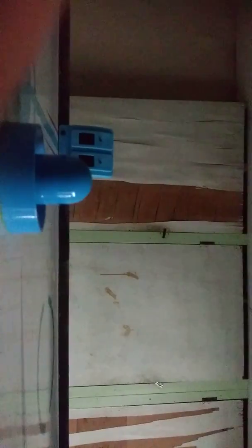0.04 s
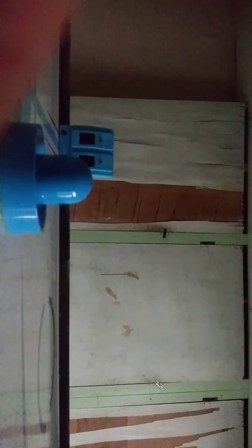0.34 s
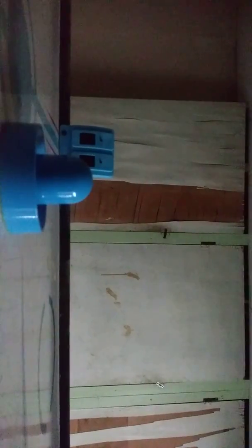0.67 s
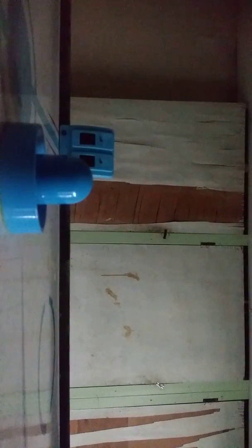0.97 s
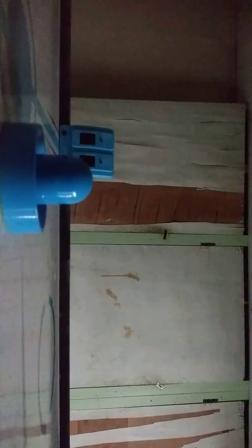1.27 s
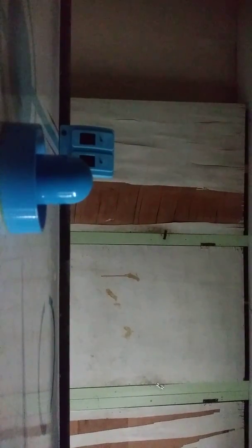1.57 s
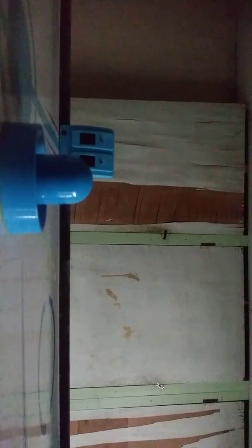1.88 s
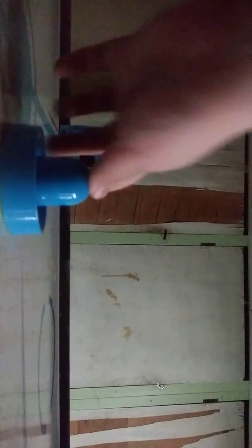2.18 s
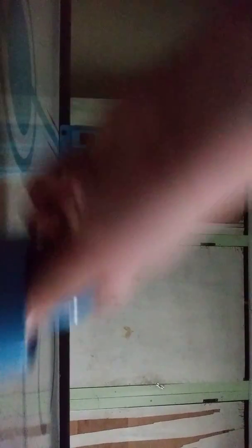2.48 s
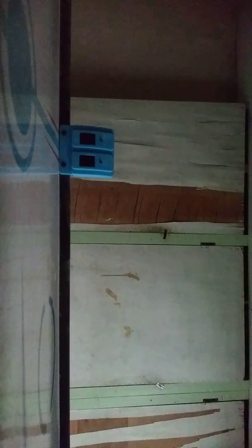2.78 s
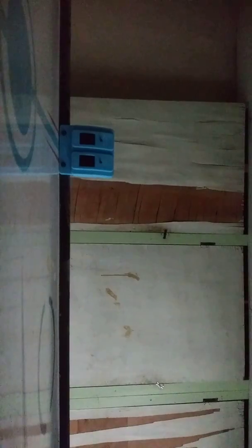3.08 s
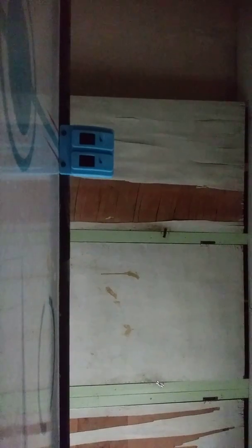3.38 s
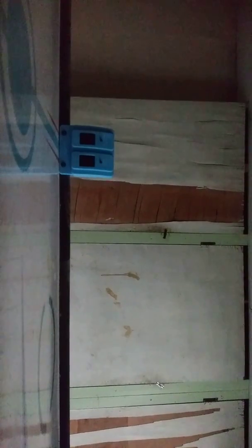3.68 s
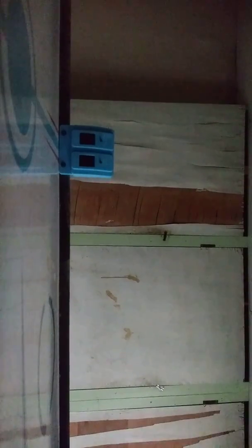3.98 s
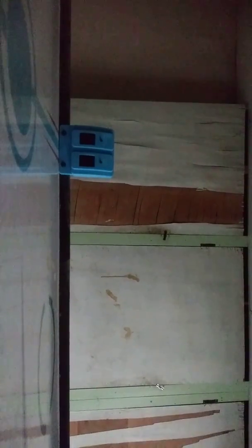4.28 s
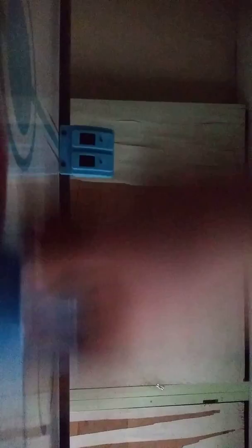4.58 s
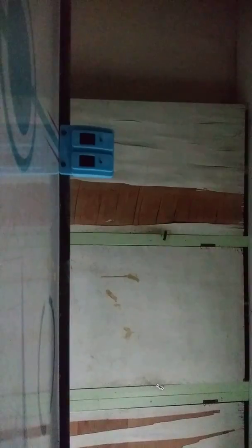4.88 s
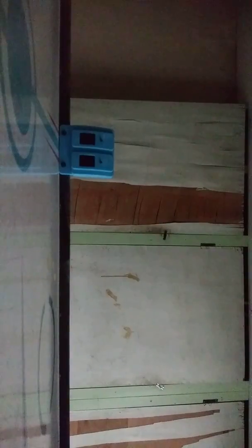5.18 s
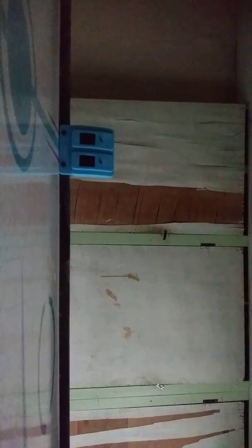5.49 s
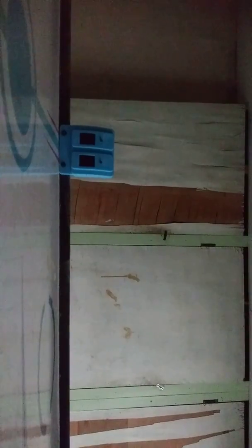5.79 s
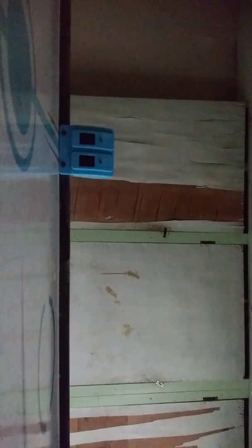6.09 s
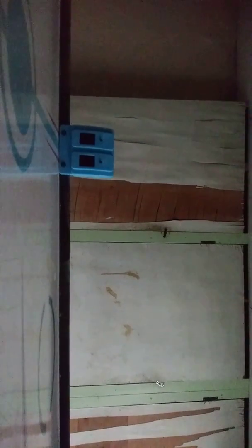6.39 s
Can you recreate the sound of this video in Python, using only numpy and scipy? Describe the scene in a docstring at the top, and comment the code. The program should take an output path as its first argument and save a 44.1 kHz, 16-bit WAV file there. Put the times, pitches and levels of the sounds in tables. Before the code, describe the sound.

A plastic puck clacks and scrapes across an air hockey table, with two hard, booming hits over a steady blower whine.

```python
"""A plastic puck on an air hockey table in a small room, heard from the table's edge.
The puck glides over the air holes with a grainy scrape, is hit hard twice, clacks against the rails
and chatters as it wobbles and settles. Each hard blow makes the hollow table boom.
Behind it the blower's fan whines steadily over rushing air, and at the start
air hisses past a hand and a resting mallet."""
import sys
import numpy as np
from scipy import signal
from scipy.fft import rfft, irfft
from scipy.io import wavfile

SR = 44100
rng = np.random.default_rng(int(sys.argv[2]) if len(sys.argv) > 2 else 0)


def wrap_up_sound(samples):
    """Save the sound to the file named by the first command line argument, as 16-bit audio."""
    columns = np.atleast_2d(samples).T
    # keep every value between -1 and 1, then stretch to whole-number steps
    tamed = np.clip(columns, -1, 1)
    steps = np.round(tamed * 32767).astype(np.int16)
    wavfile.write(sys.argv[1], SR, steps)


N = 284445
TIME = np.arange(N) / SR
HZ = np.fft.rfftfreq(N, 1 / SR)
RING_TIME = TIME[:SR // 2]  # the half second after a hit
TOP_HZ = 15950  # upper edge of the treble


def knocks():
    """A blow makes a clack, the puck rings briefly, and a boom spreads through the hollow table."""
    # each blow: (time [s], clack level [dB], clack pitch [Hz], clack ring time [s], puck level [dB],
    # treble cutoff [Hz], boom level [dB], place [0 side rail to 1 end rail])
    blows = [(3.0741, -14.5, 5800, 0.0056, -8.5, 11000, -11, 0.11),
             (3.0771, -6.5, 428, 0.02, -11.5, 4000, -26, 0),
             (3.0882, -3.5, 497, 0.066, -42, 3000, -21.5, 0),
             (3.1488, -15, 1790, 0.012, -19, 3800, -46, .5),
             (3.2190, -26, 1850, 0.0049, -17.5, 5300, -57, .5),
             (3.3983, -20, 2780, 0.007, -25, 7060, -31, 0.31),
             (3.573, -29, 1410, 0.088, -22, 6500, -27, 0.32),
             (4.2678, 6.5, 1600, 0.0054, -9, 4560, -9.5, 0.73),
             (4.2804, -20, 1380, 0.057, -6, 12000, -15.5, 0.65),
             (4.3765, 0, 4640, 0.0027, -14, 8900, -30, 0.47),
             (4.4644, -6.5, 2120, 0.0045, -10.5, 6000, -24, 0.73),
             (5.28, -32, 1450, .08, -33, 3980, -45, 0.49),
             (5.7548, -47, 3010, 0.0091, -28, 13000, -30.5, 0.44)]
    # the puck struck on its edge: (pitch [Hz], level [dB], ring time [s])
    puck_tones = [(1387, -12.5, 0.027), (1850, -6, .012), (2610, -8, 0.01), (3196, 1, 0.0046),
                  (4540, 0.5, 0.0043), (5230, -8.5, 0.0078), (6280, -5.5, 0.0042), (9600, -16, 0.0075),
                  (11800, -24, 0.0044), (14600, -12, .004)]
    # the table's tones: (pitch [Hz], level from side rail [dB], level from end rail [dB], ring time [s])
    table_tones = [(191, -13, -50, 0.22), (273, -23.5, 0, 0.26), (368.6, -14.5, -8.5, 0.13),
                   (408, -20, -30, 0.29), (437, -6.5, -14, 0.051), (496, 8, -33, 0.091),
                   (550.4, -20, -12, 0.22), (636, -11, 3, 0.045), (676, -15, -4.5, 0.12),
                   (743.5, -14, -15, 0.24), (942, -2, -54, 0.08), (1006, -18, -66, 0.11),
                   (1050, -4, -78, 0.091), (1144, -23, -23, 0.4), (1397, -10, -8, 0.086),
                   (1487, -11, -5, 0.086)]
    # the table's many weak tones blur into a rumble: (frequency [Hz], level [dB])
    rumble_colour = [(30, -40), (140, -34), (250, 5), (700, 2), (1500, 2), (2100, -4), (4000, -4.5),
                     (6500, -15), (8500, -25.5), (16000, -32)]
    # how long that rumble lasts: (frequency [Hz], ring time [s])
    rumble_times = [(200, 0.66), (1500, 0.37), (4000, 0.13), (12000, 0.25)]
    out = np.zeros(N)
    table_hz, side_db, end_db, table_ring_s = np.transpose(table_tones)
    spread = 1 - np.exp(-RING_TIME / 0.0025)
    for start, clack_db, hz, ring_s, puck_db, cutoff_hz, boom_db, place in blows:
        clack = ring(hz, clack_db, ring_s)
        clack *= 1 - np.exp(-RING_TIME[:len(clack)] * hz / 0.61)  # builds up in about one cycle
        puck = amp(-14) * rng.standard_normal(len(RING_TIME)) * np.exp(-RING_TIME / 0.0021)
        add(puck, 0, ring(*np.transpose(puck_tones)))
        contact = signal.butter(2, cutoff_hz, fs=SR)  # a longer contact leaves out the treble
        boom = ring(table_hz, side_db + place * (end_db - side_db), table_ring_s)
        add(out, start, clack)
        add(out, start, amp(puck_db) * signal.lfilter(*contact, puck))
        add(out, start, amp(boom_db) * boom * spread[:len(boom)])
        add(out, start, amp(boom_db + 17) * dying_noise(rumble_colour, rumble_times))
    return out


def chatter(extra_slaps):
    """The wobbling puck slaps the table, each time on another part of its rim."""
    # the main slaps: (time [s], level [dB], brightness [dB per octave])
    slaps = [(.527, -42, 9), (1.995, -45, 6), (3.485, -51, 23), (3.606, -27, 1), (4.476, -24, -1),
             (4.483, -22, -12), (4.507, -21.5, -9), (4.5326, -19.5, 0), (4.538, -20, 0), (4.5456, -19, -4),
             (4.571, -23, 3), (4.578, -17.5, -3), (4.599, -27, 6), (4.946, -31, -0.5), (4.9776, -34, -5),
             (5.192, -32, -1)]
    # the puck landing flat: (pitch [Hz], level [dB], ring time [s])
    slap_tones = [(1480, -14, 0.013), (2570, -8.5, 0.0055), (3200, -6.5, 0.029), (3710, -6.5, 0.015),
                  (4530, -9, 0.0071), (5700, -11, 0.017), (6700, -17, 0.012), (9100, -19, 0.014),
                  (12600, -31, .008), (15000, -39, 0.0026)]
    out = np.zeros(N)
    hz, db, ring_s = np.transpose(slap_tones)
    snap_fade = np.exp(-RING_TIME[:SR // 50] / .0012)
    chances = rng.standard_normal((200, 2, len(hz)))
    bursts = rng.standard_normal((200, SR // 40))
    for (start, slap_db, bright_db), (spot, detune), burst in zip(slaps + extra_slaps, chances, bursts):
        tilt_db = bright_db * np.log2(hz / 4000)
        add(out, start, ring(hz * (1 + 0.027 * detune), slap_db + db + tilt_db + 2.6 * spot, ring_s))
        add(out, start, amp(slap_db + bright_db - 13) * burst[:len(snap_fade)] * snap_fade)
    return out


def wobbles(scrape_gain, per_s=45, above_scrape_db=9.5, spread_db=8):
    """Random slaps for chatter() to play: the faster the slide, the louder they are."""
    chance = rng.random(N)
    strength, bright = rng.uniform(-1, 1, (2, N))
    moments = np.flatnonzero((scrape_gain > amp(-50)) & (chance < per_s / SR))
    return [(i / SR, 20 * np.log10(scrape_gain[i]) + above_scrape_db + spread_db * strength[i],
             5 * bright[i]) for i in moments]


def slide_gains(sing_lag_s=0.085):
    """Each slide swells to its fastest moment and dies away; the puck sings as it slows."""
    # (fastest moment [s], swell time [s], fade time [s], scrape [dB], fizz [dB], singing [dB])
    slides = [(1.8, .17, .15, -50, -65, -65), (2.55, 0.33, 0.39, -59, -56.5, -68),
              (3.05, 0.29, 0.023, -51, -49, -64), (3.41, 0.081, 0.12, -48, -52, -46.5),
              (3.63, 0.044, 0.078, -42.5, -45, -60), (3.78, 0.077, 0.13, -43, -50.5, -40.5),
              (4.335, 0.026, .05, -35.5, -41.5, -41), (4.48, 0.077, 0.18, -37, -45.5, -42),
              (5.23, 0.14, 0.16, -50, -60, -49), (5.78, 0.066, 0.063, -45.5, -57, -56),
              (5.95, 0.14, 0.24, -48.5, -52, -47.5)]
    power = np.zeros((3, N))
    for fastest, swell_s, fade_s, *levels_db in slides:
        for layer, db, peak_s in zip(power, levels_db, (fastest, fastest, fastest + sing_lag_s)):
            from_peak = np.maximum((peak_s - TIME) / swell_s, (TIME - peak_s) / fade_s)
            layer += (amp(db) * np.exp(-from_peak.clip(0, 20))) ** 2
    return np.sqrt(power)


def glide(scrape_gain, fizz_gain, sing_gain):
    """The puck's rim rubs the table in tiny grains, and its disc sings faintly."""
    # the body of the rubbing sound: (frequency [Hz], level [dB])
    scrape_colour = [(30, -50), (900, -7), (1600, 2.5), (2400, 3.5), (3200, 2), (4600, 2), (5500, -4),
                     (6500, -5.5), (8000, -18), (16000, -39)]
    # its high fizz: (frequency [Hz], level [dB])
    fizz_colour = [(30, -50), (3000, -4), (6000, 3), (8000, -3.5), (9500, 2.5), (11500, 1), (13500, -4),
                   (16000, 0)]
    grain = unit(amp(1.9 * drift(220) + 0.83 * drift(35)))
    scrape = scrape_gain * coloured_noise(scrape_colour)
    fizz = fizz_gain * coloured_noise(fizz_colour)
    sing = sing_gain * pitched_noise(hz=1415, width_hz=55)
    return grain * (scrape + fizz) + sing


def grit():
    """The rim catches and lets go, making uneven runs of tiny, bright ticks."""
    # each run: (start [s], stop [s], level [dB], rate [ticks per s])
    runs = [(2.971, 3, -37, 230), (4.705, 4.745, -37.5, 140), (4.747, 4.785, -41, 80),
            (4.849, 5.087, -46.5, 36)]
    # the rim's highest tones: (pitch [Hz], level [dB], ring time [s])
    tick_tones = [(2909, -1, 0.012), (5570, -4, 0.011), (7400, -11, 0.0076), (8500, -10.5, 0.013),
                  (10500, -9.5, 0.019), (12100, -9, 0.0088), (12600, -10, 0.0098)]
    out = np.zeros(N)
    hz, db, ring_s = np.transpose(tick_tones)
    for start, stop, run_db, per_s in runs:
        chances = rng.uniform(-1, 1, size=(40, len(hz) + 2))
        for beat, chance in zip(np.arange(start, stop, 1 / per_s), chances):
            late, strength, spot = chance[0], chance[1], chance[2:]
            tick = ring(hz * (1 + .08 * spot[::-1]), run_db + 5 * strength + db + 4 * spot, ring_s)
            add(out, beat + .5 * late / per_s, tick)
    return out


def scuffs():
    """Plastic rubs briefly on the table, swelling and stopping."""
    # each rub: (time [s], length [s], level [dB], centre [Hz], width [octaves])
    rubs = [(3.107, 0.024, -39, 3060, .07), (3.11, 0.016, -37, 2300, 0.047), (3.26, 0.032, -40, 2440, 0.4),
            (4.317, 0.038, -41, 4130, 0.76)]
    out = np.zeros(N)
    for start, length, db, hz, octaves in rubs:
        band = np.exp(-.5 * (np.log2((HZ + 1) / hz) / octaves) ** 2)
        rub = noise(band)[:int(length * SR)]
        add(out, start, amp(db) * rub * signal.windows.tukey(len(rub), .5))
    return out


def bumps():
    """Soft bumps on the table's frame make dull thuds that are gone in a tenth of a second."""
    # each bump: (time [s], level [dB])
    thuds = [(2.354, -32.5), (3.395, -43), (5.28, -35), (5.49, -34), (5.77, -34)]
    # the frame's dull sound: (frequency [Hz], level [dB])
    thud_colour = [(30, -20), (110, -20), (220, 8), (380, -1), (800, -32), (3000, -50)]
    swell = np.zeros(N)
    for start, db in thuds:
        add(swell, start, amp(db) * RING_TIME / 0.02 * np.exp(1 - RING_TIME / 0.011))
    return swell * coloured_noise(thud_colour)


def blower(whine_hz=1082.3):
    """The fan whines at four times its turning rate, over air rushing through the hollow table."""
    # the whine slowly swells and sinks: (time [s], level [dB])
    whine_levels = [(0, -38.5), (.75, -36.5), (1.05, -40), (1.45, -38.5), (1.85, -40), (4.3, -40), (5, -37),
                    (5.95, -37), (6.3, -40)]
    # air in the blower and holes: (frequency [Hz], level [dB])
    rush_colour = [(30, -31), (100, -17.5), (150, -16.5), (195, 0.5), (290, 3), (420, 1.5), (620, 2.5),
                   (850, 3.5), (1200, -2), (1800, -6), (2800, -11.5), (4400, -14), (6500, -23.5),
                   (8000, -33.5), (16000, -34.5)]
    # air ringing in hollow spaces: (pitch [Hz], width [Hz], level [dB])
    hollows = [(278, 26, -57.5), (364.4, 14.6, -54), (540.4, 3.9, -62.5), (476, 8.5, -50.5),
               (710, 70, -54.5), (941.4, 12, -53), (14750, 500, -73.5)]
    # the lower hiss of air passing the hand and resting mallet: (frequency [Hz], level [dB])
    low_colour = [(30, -50), (500, -24), (1100, -2), (1350, 3), (1900, -2), (2400, -8.5), (3200, -32),
                  (12000, -61)]
    # the sharper part of that hiss: (frequency [Hz], level [dB])
    sharp_colour = [(30, -46), (2400, -22), (3400, 6), (4300, 5), (4900, -20), (7000, -43)]
    whine_db = np.interp(TIME, *np.transpose(whine_levels))
    fan_angle = 2 * np.pi * whine_hz / 4 * TIME + .04 * drift(2)

    def fan_tone(db, per_turn):
        return np.sqrt(2) * amp(db) * np.sin(per_turn * fan_angle)

    # the hiss dies away as the hand leaves
    low_db = hold_then_fade(-45.5, until_s=0.75, fade_db_per_s=71)
    sharp_db = hold_then_fade(-54, until_s=0.45, fade_db_per_s=170)
    whine = fan_tone(whine_db + .5 * drift(59), per_turn=4)
    hum = fan_tone(-48 + 1.76 * drift(3), per_turn=1)
    overtone = fan_tone(np.maximum(-56, low_db - 1.5), per_turn=5)
    rush = amp(-41.5 + 0.6 * drift(4.4)) * coloured_noise(rush_colour)
    drone = sum(amp(db) * pitched_noise(hz, width) for hz, width, db in hollows)
    hiss = amp(low_db) * coloured_noise(low_colour) + amp(sharp_db) * coloured_noise(sharp_colour)
    return whine + hum + overtone + rush + drone + hiss


def room_echo(hits, delay_s=.008):
    """The nearby walls send the hits back as a short blur of echoes."""
    # how long the echo lasts: (frequency [Hz], ring time [s])
    echo_times = [(200, 0.16), (1500, 0.23), (5000, 0.29), (14000, 0.21)]
    # what the walls send back: (frequency [Hz], level [dB])
    echo_colour = [(100, -30), (400, 21.5), (3000, 9), (7000, 5.0), (15000, -1.0)]
    out = np.zeros(N)
    add(out, delay_s, signal.fftconvolve(hits, dying_noise(echo_colour, echo_times)))
    return out


def amp(db):
    """Turns decibels into a gain to multiply by."""
    return 10 ** (np.asarray(db) / 20)


def unit(x):
    """Scales a signal to an average power of 1."""
    return x / np.sqrt(np.mean(x ** 2) + 1e-20)


def look_up(points, hz):
    """Reads between a table's rows, with frequency spaced in octaves."""
    row_hz, value = np.transpose(points)
    return np.interp(np.log(hz + 1), np.log(row_hz + 1), value)


def add(mix, start, sound):
    """Mixes a sound in at a start time in seconds."""
    part = mix[round(start * SR):][:len(sound)]
    part += sound[:len(part)]


def hold_then_fade(db, until_s, fade_db_per_s):
    """A level in dB that holds, then falls."""
    return db - fade_db_per_s * np.maximum(TIME - until_s, 0)


def noise(gain):
    """Noise of power 1, shaped by a gain at each frequency."""
    return unit(irfft(rfft(rng.standard_normal(N)) * gain, N))


def coloured_noise(colour):
    """Noise whose table sets the balance of bass and treble, not the loudness."""
    return noise(amp(look_up(colour, HZ)))


def pitched_noise(hz, width_hz):
    """Noise ringing around one pitch."""
    return noise(1 / (1 + ((HZ - hz) / width_hz) ** 2))


def drift(per_s):
    """A random wander, up to about per_s swings a second."""
    return noise(1 / (1 + (HZ / per_s) ** 4))


def ring(hz, db, ring_s):
    """Tones that each fall 60 dB in their ring time; neighbours swing in opposite directions."""
    hz, db, ring_s = (np.reshape(column, (-1, 1)) for column in (hz, db, ring_s))
    t = RING_TIME[:int(np.max(ring_s) * 2 * SR) + 2]
    sign = (-1) ** np.arange(len(hz))[:, None]
    return (sign * amp(db - 60 * t / ring_s) * np.sin(2 * np.pi * hz * t)).sum(0)


def dying_noise(colour, ring_times):
    """A noise burst of energy 1, each frequency band dying at its own speed."""
    hz, t, bands = signal.stft(rng.standard_normal(len(RING_TIME)), SR, nperseg=512)
    bands *= amp(look_up(colour, hz)[:, None] - 60 * t / look_up(ring_times, hz)[:, None])
    burst = signal.istft(bands, SR)[1][:len(RING_TIME)]
    return burst / np.linalg.norm(burst)


def scene():
    """Puck and table in a small room, over the blower."""
    scrape, fizz, sing = slide_gains()
    hits = knocks() + chatter(wobbles(scrape)) + grit() + scuffs()
    return (hits + amp(-19.5) * room_echo(hits) + bumps() + glide(scrape, fizz, sing) + blower())[None]


def record(dry):
    """A small microphone loses the bass and rounds off the hardest peaks; the top treble is cut."""
    low_hz, ceiling = 150, .9
    thin = signal.sosfilt(signal.butter(3, low_hz, "highpass", fs=SR, output="sos"), dry)
    rounded = ceiling * np.tanh(thin / ceiling)
    treble_cut = signal.firwin(511, TOP_HZ, window=("kaiser", 9), fs=SR)
    return signal.oaconvolve(rounded, treble_cut[None], "same")


dry = scene()
out = record(dry)
wrap_up_sound(out)
```